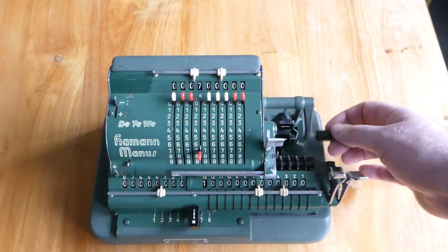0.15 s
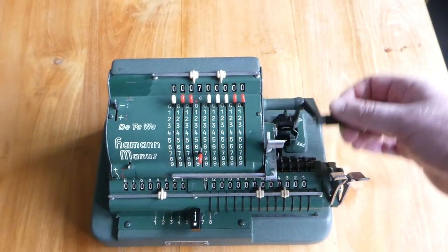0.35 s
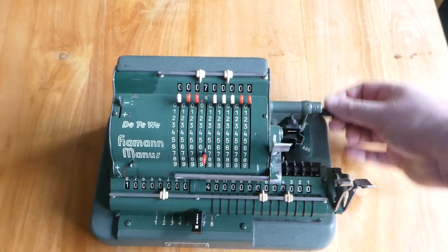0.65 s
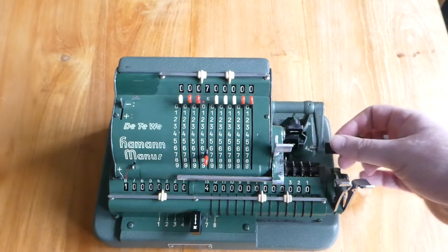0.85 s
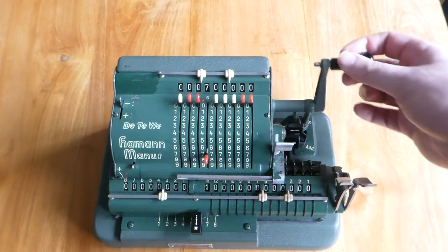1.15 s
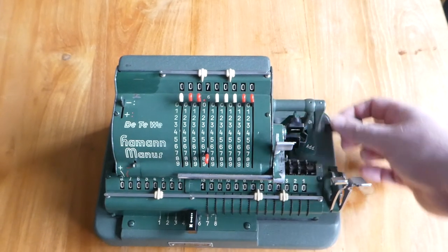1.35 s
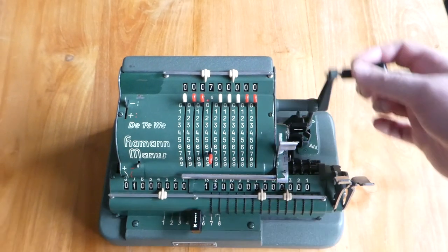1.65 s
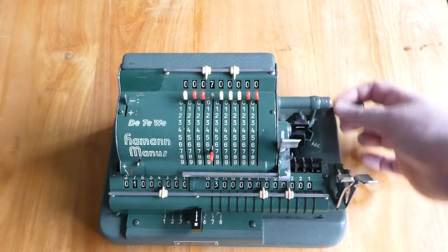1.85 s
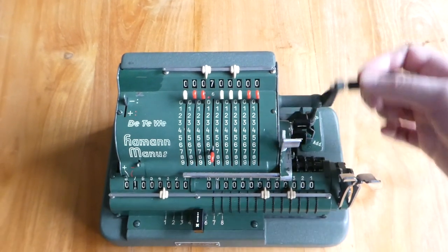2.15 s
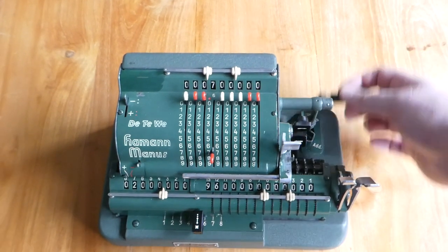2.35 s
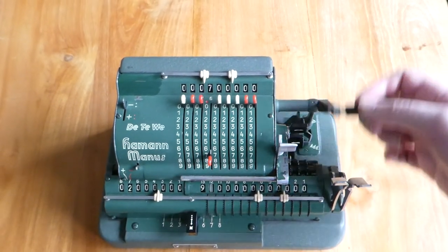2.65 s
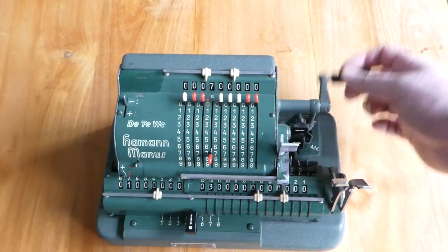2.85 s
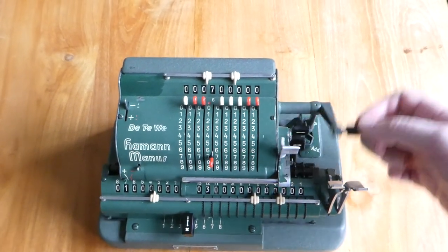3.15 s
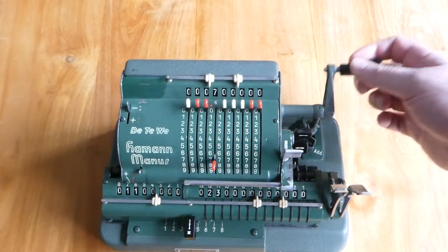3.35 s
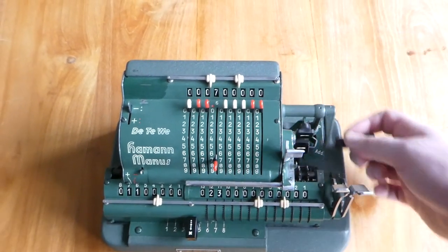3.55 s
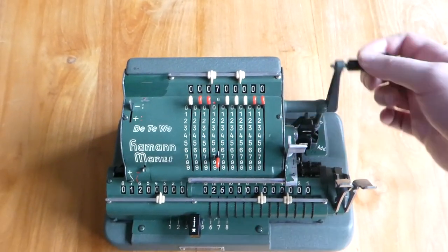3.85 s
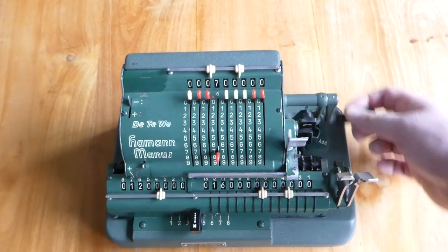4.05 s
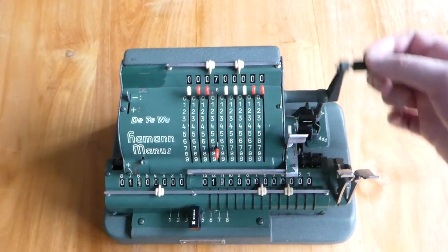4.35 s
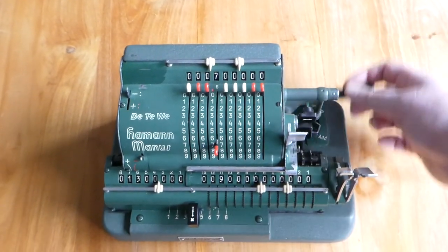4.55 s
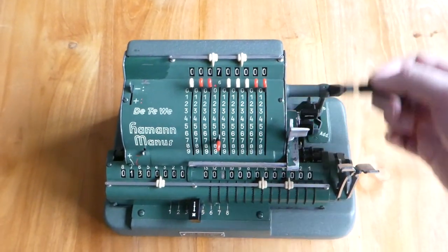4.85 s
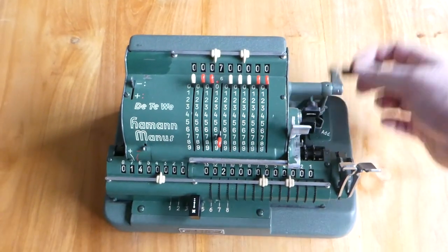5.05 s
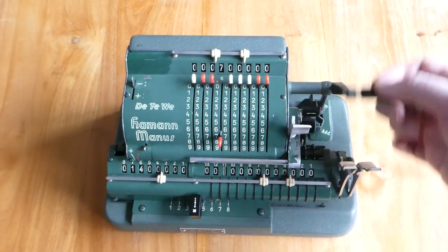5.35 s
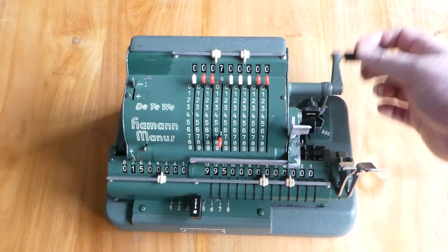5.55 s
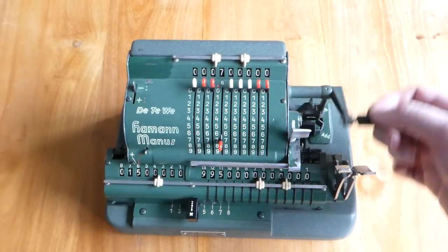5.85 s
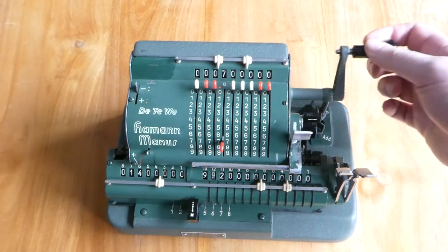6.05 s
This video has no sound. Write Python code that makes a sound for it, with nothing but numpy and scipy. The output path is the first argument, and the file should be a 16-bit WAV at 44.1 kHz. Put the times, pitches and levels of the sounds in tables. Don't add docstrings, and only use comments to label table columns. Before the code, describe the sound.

A hand-cranked metal calculating machine clatters in fast, regular bursts of dense gear clicks, punctuated by sharp carriage slams in a small room.

```python
import sys
import numpy as np
from scipy import signal
from scipy.fft import rfft, irfft
from scipy.io import wavfile
from scipy.ndimage import uniform_filter1d

SR = 44100
rng = np.random.default_rng(int(sys.argv[2]) if len(sys.argv) > 2 else 0)


def to_linear_factor(level_db):
    exponent = np.asarray(level_db, float) / 20
    return 10 ** exponent


def wav_record(signal):
    frames = np.transpose(np.atleast_2d(signal))
    bounded = np.clip(frames, -1, 1)
    quanta = np.round(bounded * 32767).astype(np.int16)
    wavfile.write(sys.argv[1], SR, quanta)


N = 273420
SPLIT_HZ = 4800

# (frequency [Hz], level [dB], t60 [s])
COVER = [(660, -34, 0.046), (728.6, -16.5, 0.13), (899, -7, 0.053), (919, -8, 0.1), (959, -6, 0.066),
         (1008, -8, 0.054), (1037.6, -2, 0.048), (1244, -6.5, 0.031), (1310, -15.5, 0.012)]
# (frequency [Hz], level [dB], t60 [s])
TABLE = [(150, -5, 0.093), (173.8, 0.5, 0.13), (206, -2.5, 0.072), (243, -13, 0.087), (346, -4.5, 0.077)]
# (frequency [Hz], level [dB], t60 [s])
CARRIAGE = [(420, -23.5, 0.028), (644, -22, 0.041), (1120, -8.5, 0.0066), (1570, -6.5, 0.0052),
            (2200, -9.5, 0.0083), (3520, -7.5, 0.013), (4120, 1, 0.0026), (6200, -3.5, 0.0024)]
# (frequency [Hz], level [dB], t60 [s])
WHEEL = [(2140, -2, 0.029), (2307, 0, 0.034), (2420, -0.5, 0.011)]
# (frequency [Hz], density [dB per Hz])
STEEL = [(880, -36), (1500, -10), (1880, -5), (2270, 0.5), (3150, -5), (3590, 0.5), (5660, -13.5),
         (6430, -7.5), (8320, -12), (10700, -9), (14900, -33), (16000, -30)]
# (frequency [Hz], density [dB per Hz])
HUSH = [(24, -48), (40, -5.5), (630, -3.5), (831, -41), (1040, -11), (10200, -34), (16000, -38)]
# (frequency [Hz], left minus right [dB])
LEAN = [(60, 0), (180, 4), (550, 2.5), (1650, -4.5), (4970, -2), (15000, 5.5)]
# (frequency [Hz], near t60 [s], far t60 [s])
ROOM = [(196, 0.18, 0.78), (780, 0.19, 0.68), (2470, 0.089, 0.56), (11900, 0.14, 0.41)]

# (time [s], level [dB])
RUB = [
    (0, -82),
    (.215, -62),
    (.235, -53),
    (.39, -54.5),
    (1.3, -47.5),
    (2.9, -53.5),
    (4.3, -48.5),
    (5.9, -50),
    (6.2, -38),
]
# (time [s], gears [dB], cover [dB], grind [dB])
ENTRIES = [(.396, -19.5, -27, -35), (1.036, -18, -27, -35.5), (1.595, -17.5, -18, -36),
           (2.138, -17, -19.5, -37), (2.675, -18, -21.5, -35.5), (3.208, -19, -18.5, -36.5),
           (3.761, -18.5, -21, -34), (4.295, -18, -32, -33), (4.860, -19, -23.5, -32.5),
           (5.373, -18.5, -22.5, -35), (5.921, -20, -20, -35)]
# (time [s], gears [dB], cover [dB])
EXITS = [(.516, -20.5, -27), (1.160, -19, -18.5), (1.702, -21.5, -24), (2.239, -20.5, -26),
         (2.786, -21, -22), (3.315, -20.5, -21), (3.869, -21, -23), (4.409, -17.5, -18),
         (4.965, -20.5, -17), (5.480, -19, -19.5), (6.036, -21.5, -22)]
# (share of the mesh [0-1], gears [dB], cover [dB], springs [dB])
TEETH = [
    (.155, -25.5, -26.5, -26),
    (.31, -24.5, -31, -28.5),
    (.46, -25.5, -25.5, -27.5),
    (.61, -25, -32, -28.5),
    (.76, -27, -24, -28),
    (.89, -21.5, -22.5, -27.5),
]
# (time [s], gears [dB], cover [dB])
FLIPS = [(.422, -19, -40), (.435, -15.5, -40), (1.145, -18.5, -26), (2.190, -19, -16), (2.731, -31, -22),
         (3.219, -24.5, -34), (3.814, -21, -20), (4.366, -23, -35), (4.922, -24, -34), (5.414, -21, -23),
         (5.997, -18.5, -18.5)]
# (time [s], gears [dB], cover [dB])
CARRIES = [(.568, -36, -24.5), (.617, -31, -16), (.642, -20, -24), (1.286, -23, -23), (1.747, -34, -27),
           (1.758, -19, -19), (1.772, -19, -18), (2.279, -33, -25), (2.295, -17.5, -30),
           (2.308, -15.5, -21), (2.827, -34, -34), (2.841, -16.5, -18.5), (2.855, -16, -26),
           (3.377, -22.5, -24.5), (3.395, -20, -20.5), (3.923, -21.5, -21.5), (3.942, -19.5, -24),
           (4.478, -22, -27.5), (4.497, -17.5, -19.5), (4.514, -42, -30), (5.011, -36, -21.5),
           (5.030, -46, -22.5), (5.043, -33.5, -32), (5.530, -35, -34), (5.544, -20, -18),
           (5.561, -16, -22.5), (5.577, -17, -25), (6.102, -18.5, -23.5), (6.118, -15, -23.5),
           (6.135, -19.5, -27.5)]
# (time [s], gears [dB], cover [dB])
RESETS = [(0, -28.5, -26), (.290, -36.5, -28.5), (1.825, -24.5, -28), (2.367, -25.5, -28.5),
          (2.911, -26, -24), (3.457, -23.5, -24), (3.987, -28, -35), (3.998, -24, -24), (4.545, -31, -48),
          (4.556, -21, -22), (5.080, -25, -45), (5.090, -19.5, -20.5), (5.618, -23.5, -28),
          (6.183, -25.5, -34)]
# (time [s], gears [dB], cover [dB])
SLACK = [(.267, -57, -39), (.312, -58, -51), (.333, -37, -64), (.355, -35.5, -58), (.971, -46, -30.5),
         (.987, -44, -51.5), (1.008, -31, -46), (1.575, -33, -58), (2.071, -37, -44), (2.110, -36, -38),
         (2.624, -39, -52), (2.647, -40, -54), (3.160, -45, -55), (3.184, -54, -48), (3.635, -34, -45),
         (3.709, -33, -47), (3.733, -33, -51), (4.257, -35, -24.5), (4.272, -43, -54), (4.829, -34, -48),
         (5.311, -33, -35), (5.348, -32.5, -44), (5.869, -45, -53), (5.891, -51, -58)]
# (time [s], level [dB])
LEVERS = [(.232, -39.5), (.706, -27.5), (.718, -34), (.824, -36.5), (1.246, -43), (1.348, -28.5),
          (1.366, -25), (1.872, -28.5), (1.894, -30), (1.918, -26), (2.412, -27), (2.431, -28.5),
          (2.957, -27.5), (2.977, -26.5), (2.993, -39), (3.501, -31), (3.516, -26), (3.533, -28),
          (4.043, -26.5), (4.066, -26), (4.086, -26.5), (4.598, -28), (4.617, -25), (4.637, -26),
          (5.148, -27.5), (5.172, -23.5), (5.648, -43), (5.662, -24.5), (5.683, -29.5)]
# (time [s], level [dB])
PAWLS = [
    (.915, -22),
    (1.503, -23.5),
    (2.037, -33),
    (2.572, -25.5),
    (3.114, -27.5),
    (3.659, -25.5),
    (4.200, -23.5),
    (4.758, -25),
    (5.283, -24.5),
    (5.822, -25.5),
]
# (time [s], level [dB])
SLAMS = [
    (.772, -7),
    (1.403, -6),
    (2.475, -7.5),
    (3.032, -7),
    (5.732, -7.5),
]
# (time from the blow [s], gears [dB], cover [dB], springs [dB], chatter [s]), relative
JUMP = [
    (0, -4.5, -13, -11, .004),
    (-.012, -12, -28, -19, .010),
    (-.022, -24, -26, -34, .006),
]
# (time [s], level [dB], pace [ratio], cover and springs rattle [dB])
LATCHES = [
    (1.941, -19.5, 1., 1.5),
    (3.564, -20.5, 0.99, 0.5),
    (4.119, -20.5, 0.76, -14.5),
    (4.663, -20, 0.99, -1.5),
    (5.201, -19, .7, -5),
]
# (delay [s], gears [dB], cover [dB], springs [dB], share of the rattle [ratio])
HOLD = [
    (0, 0, 3, -4, 1),
    (.010, 0, -22, -14, -.6),
    (.019, -3, -16, -5, 1.6),
    (.040, -8, -28, -24, 0),
]
# (time [s], level [dB])
THUDS = [(0.588, -28.5), (0.774, -21), (1.406, -22), (2.476, -27), (3.037, -29), (3.384, -35), (3.936, -33),
         (4.481, -32.5), (5.026, -29), (5.549, -35), (5.734, -29)]


def at_hz(points, hz, column=1):
    points = np.array(points)
    return np.interp(np.log(hz), np.log(points[:, 0]), points[:, column])


def shaped(x, points):
    hz = np.maximum(np.fft.rfftfreq(x.shape[-1], 1 / SR), 1)
    x = irfft(rfft(x) * to_linear_factor(at_hz(points, hz)), x.shape[-1])
    return x / np.sqrt(np.mean(x ** 2))


def butter(x, order, hz, kind):
    return signal.sosfilt(signal.butter(order, hz, kind, fs=SR, output="sos"), x)


def ring(force, hz, t60):
    radius = to_linear_factor(-60 / (t60 * SR))
    angle = 2 * np.pi * hz / SR
    return signal.lfilter([0, np.sin(angle)], [1, -2 * radius * np.cos(angle), radius * radius], force + 1e-18)


def contacts():
    def struck(rows, springs_db, chatter_s):
        return [(s, gears, cover, gears + springs_db, chatter_s) for s, gears, cover, *_ in rows]

    def snapped(rows, cover_db, springs_db):
        return [(s, db, db + cover_db, db + springs_db, .0045) for s, db in rows]

    sliding = []
    luck = rng.standard_normal((len(ENTRIES), len(TEETH), 4))
    for (start, *_), (end, *_), turn in zip(ENTRIES, EXITS, luck):
        for (share, *levels), z in zip(TEETH, turn):
            s = start + (end - start) * (share + .02 * z[0])
            sliding.append((s, *(levels + 2.5 * z[1:]), .009))
    sliding += struck(EXITS, 0, .009) + struck(FLIPS, -4, .009)

    rest = struck(ENTRIES, -2, .008) + struck(SLACK, -11, .011)
    rest += struck(CARRIES, -2.5, .011) + struck(RESETS, -2.5, .017)
    rest += snapped(LEVERS, -6.5, -8) + snapped(PAWLS, -5, -7)
    for s, db in SLAMS:
        for late, *levels, chatter_s in JUMP:
            rest.append((s + late, *(db + np.array(levels)), chatter_s))
    for s, db, pace, rattle_db in LATCHES:
        for late, gears, cover, springs, share in HOLD:
            rattle = rattle_db * share
            rest.append((s + pace * late, db + gears, db + cover + rattle, db + springs + rattle, .0045))
    rows = sliding + rest
    return np.transpose(rows), np.arange(len(rows)) < len(sliding)


def chatter(times, spread_s, count):
    late = rng.random((len(times), count))
    size = late ** 0.5 * to_linear_factor(-16 * late)
    at = np.clip(((times[:, None] + late * spread_s) * SR).astype(int), 0, N - 1)
    return at, size / np.linalg.norm(size, axis=1, keepdims=True)


def friction():
    t = np.arange(N) / SR
    level = to_linear_factor(np.interp(t, *np.transpose(RUB)))
    for (start, *_, grind_db), (end, *_) in zip(ENTRIES, EXITS):
        meshed = (t > start + .004) & (t < end + .008)
        level = level + to_linear_factor(grind_db) * meshed
    return signal.lfilter([.006], [1, -.994], level)


def grit(per_s, uneven_db):
    hits = (rng.random(N) < per_s / SR) * rng.choice([-1, 1], N)
    hits = hits * to_linear_factor(uneven_db * np.minimum(rng.exponential(1, N), 4))
    return hits / np.sqrt(np.mean(hits ** 2))


def strike(modes, times, levels_db, spread_s, vary_db, rub, width_db):
    out = np.zeros((2, N))
    at, size = chatter(times, spread_s, count=24)
    for hz, mode_db, t60 in modes:
        force = np.roll(rub, rng.integers(0, 90))
        strength = to_linear_factor(levels_db + vary_db * rng.standard_normal(len(times)))
        swarm = size * rng.standard_normal(size.shape)
        luck = np.abs(np.sum(swarm * np.exp(2j * np.pi * hz * at / SR), axis=1))
        strength = strength / np.sqrt(0.25 + 1.017 * luck ** 2)
        np.add.at(force, at, swarm * strength[:, None])
        lean_db = at_hz(LEAN, hz) + np.clip(width_db, 0, 4) * rng.standard_normal()
        out += ring(force, hz, t60) * to_linear_factor(mode_db + np.array([[.5], [-.5]]) * lean_db)
    return out


def steel_modes(low_hz, high_hz, cycles, count):
    hz = np.geomspace(low_hz, high_hz, count) * (1 + 0.0096 * rng.standard_normal(count))
    level_db = at_hz(STEEL, hz) + 10 * np.log10(hz)
    level_db -= 10 * np.log10(np.sum(to_linear_factor(level_db) ** 2))
    return zip(hz, level_db, cycles / hz * rng.uniform(1.0, 1.18, count))


def machine():
    (times, gears_db, cover_db, springs_db, lasting), sliding = contacts()
    lasting, drag = lasting[:, None], friction()
    gears = strike(steel_modes(1538, SPLIT_HZ, cycles=22.5, count=26), times, gears_db + 5.5, lasting,
                   vary_db=1.0, rub=to_linear_factor(-15) * drag * grit(per_s=1200, uneven_db=7), width_db=1.0)
    cover = strike(COVER, times, cover_db - 4.5, 0.9146 * lasting,
                   vary_db=2.5, rub=to_linear_factor(-29) * drag * grit(per_s=1200, uneven_db=3.0), width_db=3.0)
    springs = strike(steel_modes(SPLIT_HZ, 16000, cycles=21.1, count=30), times, springs_db + 9.5, .9 * lasting,
                     vary_db=3.5, rub=to_linear_factor(-11.5) * drag * grit(per_s=4900, uneven_db=6), width_db=3.0)
    wheel = strike(WHEEL, times[sliding], gears_db[sliding] - 14.5, spread_s=0.0076,
                   vary_db=4.0, rub=to_linear_factor(-23.5) * drag * grit(per_s=1100, uneven_db=5.0), width_db=-5.0)
    return butter(gears + cover + springs + wheel, 4, 380, "high")


def room(x, near_db, far_db):
    t, edges, tail = np.arange(SR // 2) / SR, np.geomspace(90, 17000, 9), 0
    onset = 1 - np.exp(-t / 0.0044)
    for low, high in zip(edges, edges[1:]):
        band = butter(rng.standard_normal((3, 3, len(t))), 2, [low, high], "band")
        hz = np.sqrt(low * high)
        alike = np.clip(0.95 - 0.14 * np.abs(np.log2(hz / 1600)), 0, .95)
        near = to_linear_factor(near_db - 60 * t / at_hz(ROOM, hz, column=1))
        far = to_linear_factor(far_db - 60 * t / at_hz(ROOM, hz, column=2))
        ears = alike * band[:, 2:] + np.sqrt(1 - alike ** 2) * band[:, :2]
        tail = tail + onset * (near + far) * ears
    spot = np.repeat(rng.integers(0, 3, N // 800 + 1), 800)[:N]
    out = 0
    for k, echo in enumerate(tail):
        share = uniform_filter1d(1. * (spot == k), size=200)
        out = out + signal.oaconvolve((share * x.mean(0))[None], echo, axes=1)[:, :N]
    return out


def room_hush():
    return to_linear_factor(-64) * shaped(rng.standard_normal((2, N)), HUSH)


def stand_shiver(push):
    rumble = shaped(rng.standard_normal((2, N)), [(20, 10.0), (110, -20.0), (200, -21.5)])
    return (to_linear_factor(-88) + to_linear_factor(-40) * push) * rumble


def table(push):
    times, blow_db = np.transpose(THUDS)
    shake = to_linear_factor(-55) * push * grit(per_s=490, uneven_db=4.5)
    thump = strike(TABLE, times, blow_db - 9.5, spread_s=0.02, vary_db=2.5, rub=shake, width_db=5.5)
    return butter(thump, 4, [125, 600], "band")


def carriage():
    times, blow_db = np.transpose(SLAMS)
    force = np.zeros(N)
    force[((times + .001) * SR).astype(int)] = to_linear_factor(blow_db + 4)
    force[((times + .0026) * SR).astype(int)] = -to_linear_factor(blow_db - 4)
    force = butter(force, 2, 300, "high")
    out = np.zeros(N)
    for k, (hz, mode_db, t60) in enumerate(CARRIAGE):
        out += (-1) ** k * to_linear_factor(mode_db) * ring(force, hz, t60)
    return out


def scene():
    metal = machine() + carriage() * to_linear_factor([[-.4], [.4]])
    push = uniform_filter1d(np.abs(metal.mean(0)), size=600)
    near = metal + table(push)
    return near + room(near, near_db=-33.5, far_db=-43) + room_hush() + stand_shiver(push)


def roll_off(x):
    return signal.sosfilt(signal.butter(12, 16630, fs=SR, output="sos"), x)


def record(dry):
    rounded = .95 * np.tanh(dry / .95)
    mix = signal.sosfilt(signal.cheby2(10, 50, 16600, fs=SR, output="sos"), rounded)
    return roll_off(mix)


dry = scene()
out = record(dry)
wav_record(out)
```